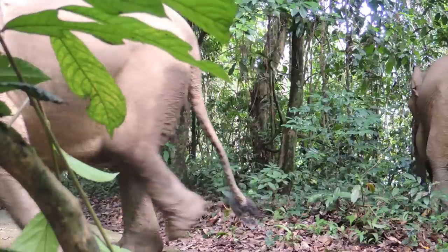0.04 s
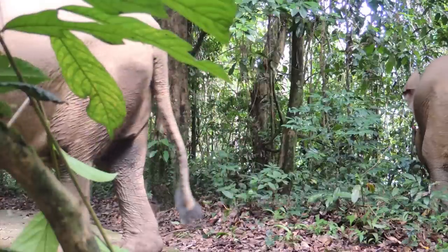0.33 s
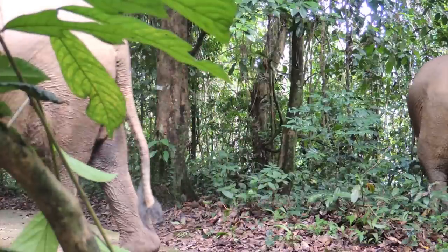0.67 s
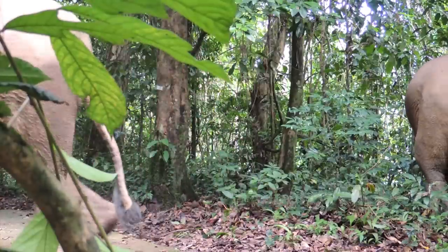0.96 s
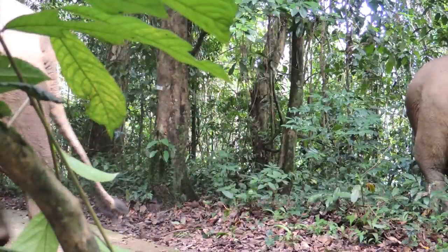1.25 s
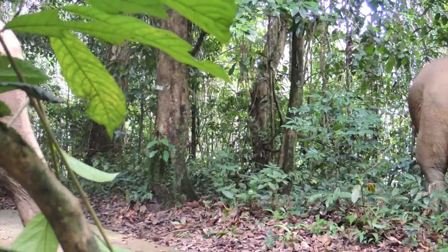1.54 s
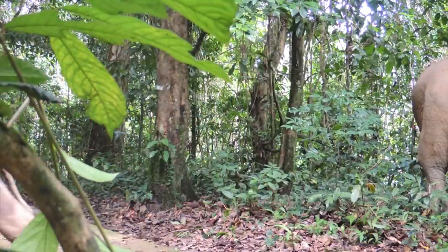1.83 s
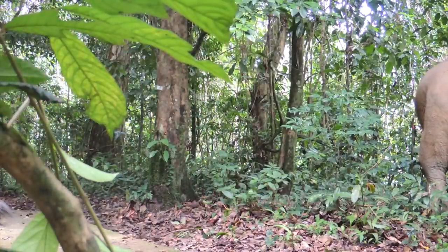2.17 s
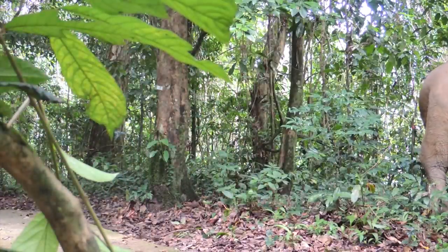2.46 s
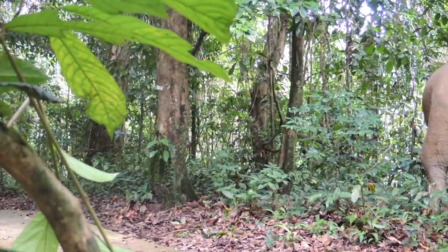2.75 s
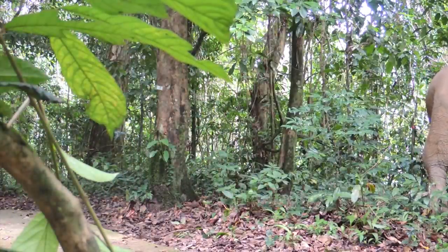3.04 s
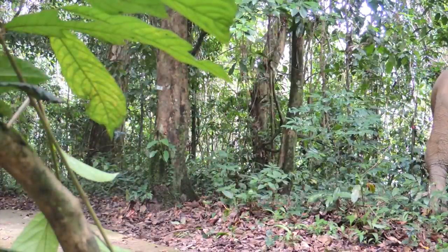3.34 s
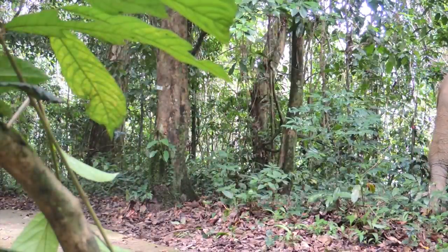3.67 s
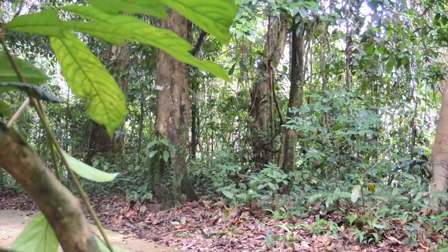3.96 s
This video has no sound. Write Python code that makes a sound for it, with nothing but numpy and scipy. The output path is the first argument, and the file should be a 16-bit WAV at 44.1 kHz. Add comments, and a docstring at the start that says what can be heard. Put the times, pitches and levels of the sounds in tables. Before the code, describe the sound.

An elephant's breathy trunk blast dominates the ending, a few metres away in a rainforest. High insects trill throughout. Until about 2.5 seconds, padded feet thud, crush dry leaves and snap twigs, with quick foliage swishes. A low rumble starts at 1.2 seconds and continues; a faint distant hoot comes around 2.4. From 2.8 the blast hisses, flutters and briefly whistles, loudest near 3.2, fading by 4.

```python
"""A rainforest floor, with elephants walking a few metres away and insects trilling throughout.
Padded feet thud, crush dry leaves and snap twigs; something brushes the foliage, and the trees echo.
One elephant's vocal folds start a low rumble, and a faint hoot sounds far off. Then a long blast of
air rushes through a trunk, hissing at the tip, ringing the tube, fluttering and briefly whistling."""
import sys
import numpy as np
from scipy import signal
from scipy.fft import rfft, irfft
from scipy.io import wavfile

SR = 44100
rng = np.random.default_rng(int(sys.argv[2]) if len(sys.argv) > 2 else 0)


def log_audio(samples):
    """Write samples as a 16-bit WAV file to the path given in sys.argv[1]."""
    # one column per channel
    frames = np.atleast_2d(samples).T
    # limit to full scale, then quantise
    limited = np.clip(frames, -1, 1)
    pcm = np.round(limited * 32767).astype(np.int16)
    wavfile.write(sys.argv[1], SR, pcm)


N = 176400
T = np.arange(N) / SR
HZ = np.fft.rfftfreq(N, 1 / SR)

# How alike left and right sound: freq_hz, coherence
STEREO_COHERENCE = [(30,.99),(300,.96),(800,.91),(1500,.72),(3000,.5),(6000,.2),(14000,.1)]
# How far the left is ahead when lead is 1: freq_hz, phase_rad
LEFT_LEAD = [(30,-0.5),(500,1.44),(1300,1.66),(2200,1.72),(3400,2.5),(5000,3.5),(14000,8)]
# Colour of the forest bed: freq_hz, gain_db
FOREST_COLOUR = [(30,15),(70,5.5),(160,10.5),(260,3),(450,0),(800,-1),(1800,-1.5),(3500,0.5),(5000,-1),(7500,-2),(10000,-3),(14000,-4)]
# Slow swell of the bed: time_s, level_db
FOREST_LEVEL = [(0,-44.5),(1.2,-44),(2,-43),(4,-41)]
# The near insect's phrases: start_s, length_s, relative_db
TRILLS = [(-.06,0.25,-48.5),(0.355,0.27,-49),(0.712,0.26,-49.5),(1.077,0.24,-48.5),(1.558,0.24,-48.5),(1.921,0.28,-48.5),(2.323,0.27,-48.5),(2.842,.17,-47.5),(3.103,0.21,-51),(3.53,0.26,-50),(3.9,0.3,-47.5)]
# Steady insects further off: pitch_hz, width_hz, level_db
CHORUS = [(7636,710,-49),(5696,41,-59.5),(5830,50,-60)]
# Foot pads meeting the ground: start_s, level_db
THUDS = [(0.113,-45),(0.382,-52),(0.787,-42.5),(1.885,-49)]
# Leaf litter crushed underfoot: start_s, rise_s, decay_s, level_db
CRUNCHES = [(.35,0.033,0.088,-45),(.51,0.05,0.13,-44.5),(.74,0.024,0.21,-48),(1.17,0.032,0.14,-58),(1.83,0.095,0.15,-42.5),(2.4,0.03,0.093,-50.5)]
# Colour of the crunch: freq_hz, gain_db
CRUNCH_COLOUR = [(60,-8),(170,4.5),(450,-1.5),(1500,1.5),(3500,3.5),(6000,0.5),(14000,-3)]
# Twigs breaking: start_s, relative_db, pitch_hz, crack_over_ring_db
TWIGS = [(.364,-37,1183,-4),(.396,-39.5,1495,-2),(0.5556,-31,1580,-0.5),(.762,-39.5,768,0),(0.769,-43,1224,-1),(0.79,-45,1097,0),(1.222,-46,1220,-6),(1.356,-45,1005,-3),(1.435,-38.5,1774,-1),(1.86,-40,1520,-4),(1.977,-39,1510,1),(2.259,-34.5,990,-5),(2.265,-32.5,1375,-11),(2.293,-43,893,0)]
# Colour of the crack: freq_hz, gain_db
CRACK_COLOUR = [(450,-16),(950,2.5),(1700,0.5),(3500,1.5),(6000,-6.5),(14000,-18)]
# Ringing modes of a twig: pitch_ratio, gain_db
TWIG_MODES = [(1.002,-1.5),(1.28,-6),(1.75,-4.5),(2.6,-9)]
# Pulse rate of the vocal folds: time_s, pitch_hz
RUMBLE_PITCH = [(1.15,25.8),(1.4,27.7),(1.7,29.8),(2,30.4),(2.5,30.05),(4,30.8)]
# Swell of the rumble: time_s, level_db
RUMBLE_LEVEL = [(1.0,-72),(1.2,-46),(1.45,-48),(1.65,-43.5),(2.0,-42.5),(2.6,-44.5),(3.3,-43),(4,-43)]
# Timbre of the rumble: harmonic_number, gain_db
RUMBLE_HARMONICS = [(1, 1), (2, -1), (3, -23), (4, -4), (5, -13.5), (6, -10.5), (7, -18.5)]
# Sweeps through foliage: start_s, rise_s, decay_s, level_db, left_over_right_db
SWISHES = [(1.485,0.011,0.058,-34.5,-0.5),(2.249,0.0064,0.028,-29,1.5),(2.425,.008,0.018,-40,4)]
# Colour of a swish: freq_hz, gain_db
SWISH_COLOUR = [(300,-32),(1500,-22),(3500,-4.5),(6000,-4),(10000,-0.5),(14000,-2)]
# Swell of the far hoot: time_s, level_db
HOOT_LEVEL = [(2.28,-64),(2.4,-60),(2.65,-62),(2.85,-63),(3,-80)]
# Air rushing at the trunk tip: time_s, relative_db
RUSH_LEVEL = [(2.78,-56),(2.88,-45.5),(2.94,-36),(3.02,-33),(3.12,-38),(3.185,-40.5),(3.21,-35.5),(3.27,-38.5),(3.37,-35),(3.47,-39.5),(3.66,-44),(3.72,-43.5),(3.9,-52),(4,-55)]
# Colour of the rush: freq_hz, gain_db
RUSH_COLOUR = [(100,1),(550,-18),(1000,1),(2000,5),(3200,5.5),(4800,1.5),(8500,-2.5),(11000,-3),(14000,-4)]
# Leftward lean of the rush: freq_hz, left_over_right_db
RUSH_PAN = [(700,1.5),(2000,2),(5000,3),(8000,0),(13000,5)]
# Air resounding inside the trunk: time_s, level_db
TUBE_LEVEL = [(2.74,-61),(2.85,-45.5),(2.89,-48),(2.99,-39),(3.06,-32),(3.16,-29),(3.2,-36),(3.29,-31.5),(3.36,-35.5),(3.45,-43),(3.56,-42.5),(3.75,-47),(4,-56.5)]
# Resonances of the trunk: pitch_hz, width_hz, tense_db, slack_db
TUBE_MODES = [(570,60,-12,-6),(796,75,1,6),(945,60,6,-0.5),(1120,92,-7,-9),(1250,73,-4,-8),(1410,97,2.5,2),(1580,130,-2,-7),(1865,100,-2,-1.5),(2480,90,-7,-5)]
# Low flutter of the trunk: time_s, level_db
FLUTTER_LEVEL = [(2.8,-65),(2.95,-47.5),(3.07,-40),(3.215,-39.5),(3.245,-42.5),(3.28,-37),(3.39,-35),(3.45,-40),(3.505,-43),(3.53,-34.5),(3.61,-39),(3.76,-44.5),(4,-46)]
# Colour of the flutter: freq_hz, gain_db
FLUTTER_COLOUR = [(60,-21),(130,-14),(195,0),(245,-3.5),(305,3.5),(370,-6),(470,-10),(700,-13.5),(1400,-33)]
# Puffs from the trunk: centre_s, half_length_s, pitch_hz, width_hz, level_db
CHUFFS = [(2.889,0.014,1390,400,-40.5),(3.247,0.012,285,110,-32.5),(3.309,0.0068,524,380,-32),(3.53,0.016,287,170,-38),(3.715,0.046,1480,250,-44.5),(3.94,0.013,1580,350,-46)]
# Resonances that briefly sing: centre_s, half_length_s, pitch_hz, level_db
WHISTLES = [(3.095,0.026,965,-32.5),(3.156,0.01,945,-29.5),(3.15,0.013,1415,-29.5),(3.288,0.034,1428,-33),(3.2,0.023,308,-41.5)]


def amp(db):
    """Decibels to gain."""
    return 10 ** (np.asarray(db) / 20)


def unit(x):
    """Scales to rms 1."""
    return x / np.sqrt(np.mean(x ** 2) + 1e-20)


def over_hz(points):
    """Reads a curve along log frequency."""
    freq_hz, value = np.transpose(points)
    return np.interp(np.log(HZ + 1), np.log(freq_hz + 1), value)


def fader(points):
    """Gain from a dB curve, silent before its first point."""
    return amp(np.interp(T, *np.transpose(points), left=-120))


def peak(hz, width_hz):
    """Gain curve of a resonance."""
    return 1 / (1 + ((HZ - hz) / (.78 * width_hz)) ** 2)


def drift(rate_hz):
    """Slow random motion of rms 1."""
    return unit(irfft(rfft(rng.standard_normal(N)) * np.exp(-(HZ / rate_hz) ** 2), N))


def wavering_phase(hz, depth, rate_hz):
    """Phase of a tone whose pitch wanders at random."""
    return 2 * np.pi * np.cumsum(hz * (1 + depth * drift(rate_hz))) / SR


def noise(gain, lead=0, grain=0, left_db=0):
    """Coloured stereo noise of rms 1; grain breaks it into crackle, lead turns it to the left."""
    grain_sizes = np.minimum(rng.exponential(1, N // 16 + 1), 3.5)
    crackle = np.exp(grain * np.repeat(grain_sizes, 16)[:N])
    left, other = rfft(rng.standard_normal((2, N)) * crackle)
    alike = np.clip(over_hz(STEREO_COHERENCE), 0, 1)
    right = (alike * left + np.sqrt(1 - alike ** 2) * other) * np.exp(-1j * lead * over_hz(LEFT_LEAD))
    return unit(irfft(np.array([left, right * amp(-left_db)]) * gain, N))


def pan(left_db):
    """Gains of the two channels."""
    return amp([[left_db / 2], [-left_db / 2]])


def burst(start, rise_s, decay_s):
    """Linear attack, exponential decay."""
    return np.clip((T - start) / rise_s, 0, 1) * np.exp(-np.maximum(T - start - rise_s, 0) / decay_s)


def bell(centre, half):
    """A smooth swell and fall."""
    return np.exp(-((T - centre) / half) ** 2 / 2)


def forest():
    """A soft bed of distant leaves and air."""
    wash = noise(amp(over_hz(FOREST_COLOUR)), lead=.7, grain=.11)
    return wash * fader(FOREST_LEVEL) * amp(.5 * drift(9.9)) * pan(1)


def insects(pitch_hz=7834, pulse_hz=53.3, fade_s=.025):
    """One insect trills a pulsed tone, blurred by the foliage, over a steady chorus."""
    gate = sum(amp(db) * np.clip(np.minimum(T - start, start + length - T) / fade_s, 0, 1)
               for start, length, db in TRILLS)
    pulses = unit(1 + .65 * np.sin(2 * np.pi * pulse_hz * T))
    phase = wavering_phase(pitch_hz, depth=.00282, rate_hz=41)
    tone = unit(np.array([np.sin(phase), np.cos(phase)]))
    blur = .26 * noise(peak(pitch_hz, width_hz=110))
    chorus = sum(amp(db) * noise(peak(hz, width)) for hz, width, db in CHORUS)
    return unit(tone + blur) * gate * pulses * amp(1.5) + chorus * amp(.36 * drift(30))


def chirp():
    """One thin, very high insect call."""
    return noise(peak(hz=13500, width_hz=800)) * amp(-49) * bell(centre=.078, half=.013)


def footfalls():
    """Soft pads thud on the ground and crush dry leaves."""
    crunch = sum(amp(db) * burst(start, rise, decay) for start, rise, decay, db in CRUNCHES)
    leaves = noise(amp(over_hz(CRUNCH_COLOUR)), lead=.87, grain=.53) * crunch
    impacts = sum(amp(db) * burst(start, rise_s=.0083, decay_s=.012) for start, db in THUDS)
    thuds = noise(peak(hz=171, width_hz=160)) * impacts
    return leaves * pan(1.3) + thuds


def tree_echoes(sound, t60_s=.51):
    """The surrounding trees scatter sound into a short, diffuse tail."""
    t = T[:SR // 2]
    taps = rng.standard_normal((2, len(t))) * (rng.random((2, len(t))) < .05)
    tail = taps * (t > .006) * amp(-60 * t / t60_s)
    return signal.fftconvolve(sound, tail / np.linalg.norm(tail[0]), axes=1)[:, :N]


def twigs(attack_s=.0008, right_lag_s=.0001):
    """Twigs snap underfoot: a short splintering crack, and the wood rings in its modes."""
    splinters = noise(amp(over_hz(CRACK_COLOUR)), lead=.63, grain=.14)
    snaps = np.zeros((2, N))
    for start, db, hz, crack_db in TWIGS:
        t = T - start - np.array([[0], [right_lag_s]])
        ring = sum(amp(mode_db) * np.sin(2 * np.pi * (hz * ratio * t + rng.random()))
                   for ratio, mode_db in TWIG_MODES)
        crack = amp(crack_db) * splinters * burst(start, attack_s, decay_s=.011)
        snaps += amp(db) * (crack + ring * burst(start, attack_s, decay_s=.0067))
    return snaps * pan(1.1) * amp(-2.5)


def rumble(roughness=.06, wander_rad=.031):
    """Slow, even pulses of the vocal folds; each harmonic wavers a little."""
    phase = 2 * np.pi * np.cumsum(np.interp(T, *np.transpose(RUMBLE_PITCH))) / SR
    voice = sum(amp(db) * (1 + roughness * drift(9.5)) * np.cos(k * (phase + wander_rad * drift(1.1)))
                for k, db in RUMBLE_HARMONICS)
    return -unit(voice) * fader(RUMBLE_LEVEL)


def swishes():
    """Quick sweeps through foliage: dense, bright grains."""
    grains = noise(amp(over_hz(SWISH_COLOUR)), grain=.35)
    return grains * sum(amp(db) * pan(left_db) * burst(start, rise, decay)
                        for start, rise, decay, db, left_db in SWISHES)


def hoot():
    """A thin, steady far call, perhaps a bird."""
    return np.sin(wavering_phase(hz=980, depth=.0053, rate_hz=23)) * fader(HOOT_LEVEL)


def trunk_blast(relax_at_s=3.15, relax_s=.25):
    """Turbulent air hisses at the tip, rings the trunk and sets its walls flapping."""
    flap = 1 + .18 * np.sin(wavering_phase(hz=61, depth=.208, rate_hz=20.6))
    hiss = noise(amp(over_hz(RUSH_COLOUR)), lead=1, grain=.099, left_db=over_hz(RUSH_PAN))
    rush = hiss * fader(RUSH_LEVEL) * amp(6 + .48 * drift(60))
    tense = noise(sum(amp(db) * peak(hz, width) for hz, width, db, _ in TUBE_MODES), lead=.5)
    slack = noise(sum(amp(db) * peak(hz, width) for hz, width, _, db in TUBE_MODES), lead=.46)
    # The lower resonances take over as the trunk relaxes.
    relaxed = np.clip((T - relax_at_s) / relax_s, 0, 1)
    tube = (np.sqrt(1 - relaxed) * tense + np.sqrt(relaxed) * slack) * fader(TUBE_LEVEL)
    flutter = noise(amp(over_hz(FLUTTER_COLOUR)), lead=.15) * fader(FLUTTER_LEVEL)
    return rush + (tube + flutter) * flap


def chuffs():
    """Short puffs of air from the trunk punctuate the blast."""
    return sum(noise(peak(hz, width), lead=.22) * amp(db) * bell(centre, half)
               for centre, half, hz, width, db in CHUFFS)


def whistles(hoarseness=.42):
    """At the strongest flow single resonances sing for a moment, hoarsely."""
    notes = np.zeros((2, N))
    for centre, half, hz, db in WHISTLES:
        tone = unit(np.sin(wavering_phase(hz, depth=.01213, rate_hz=42.6)))
        breath = hoarseness * noise(peak(hz, width_hz=95), lead=.61)
        notes += unit(tone + breath) * amp(db) * bell(centre, half)
    return notes * pan(-1.5)


def scene():
    """Elephants and undergrowth over the forest bed; only leaves, feet and twigs feed the echo."""
    rustle, snaps = footfalls() + swishes(), twigs()
    undergrowth = rustle + snaps + tree_echoes(rustle + amp(-8) * snaps)
    calls = trunk_blast() + chuffs() + whistles() + rumble()
    return undergrowth + calls + insects() + hoot() + forest() + chirp()


def record(dry, cutoff_hz=14350):
    """A steep high cut on the whole mix."""
    lowpass = signal.firwin(701, cutoff_hz, window=("kaiser", 8), fs=SR)
    return signal.oaconvolve(dry, lowpass[None], "same")


dry = scene()
out = record(dry)
log_audio(out)
```